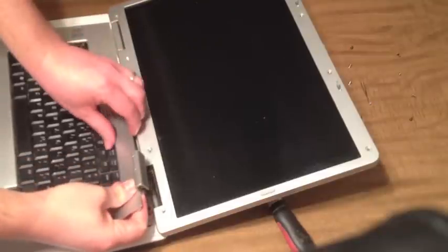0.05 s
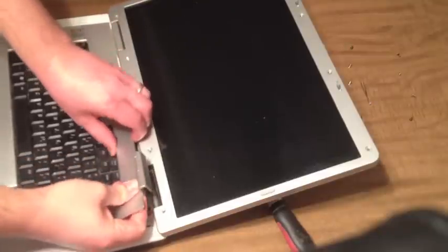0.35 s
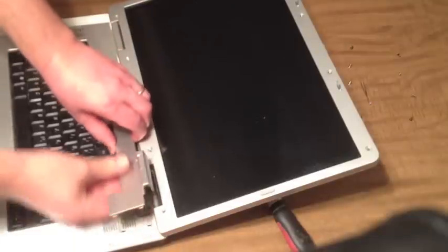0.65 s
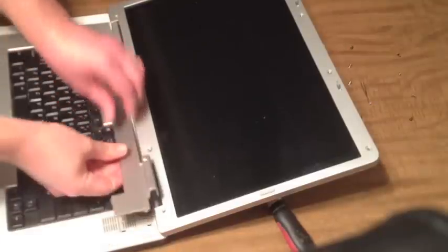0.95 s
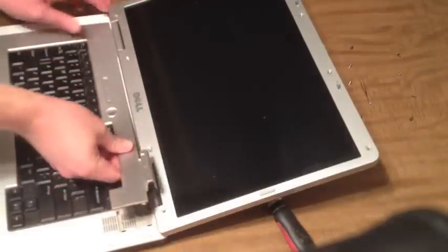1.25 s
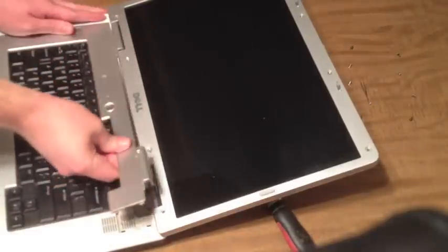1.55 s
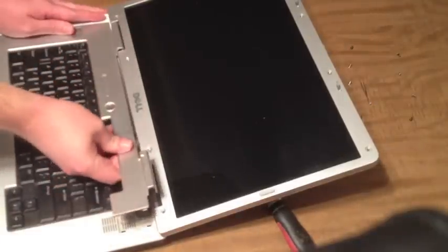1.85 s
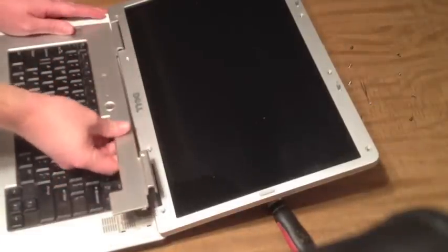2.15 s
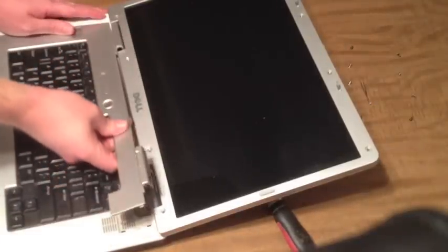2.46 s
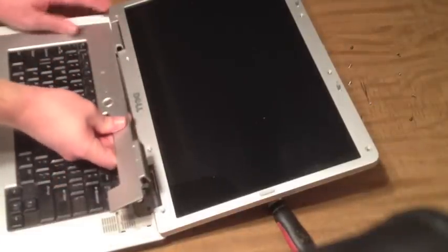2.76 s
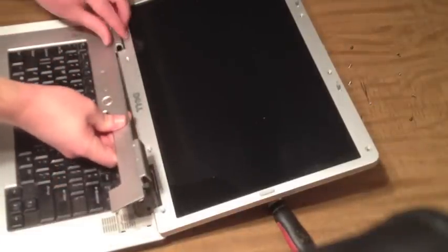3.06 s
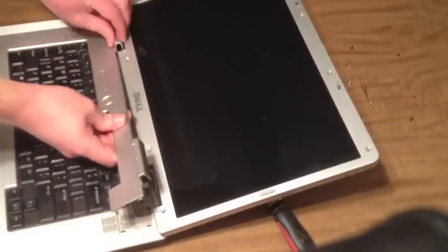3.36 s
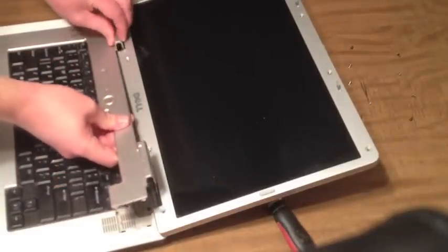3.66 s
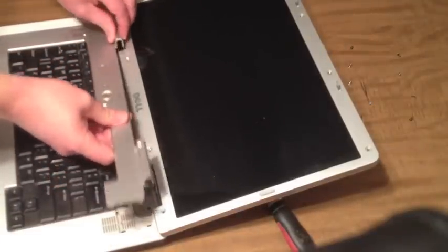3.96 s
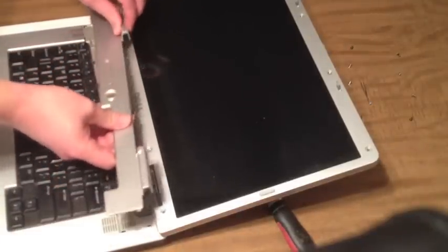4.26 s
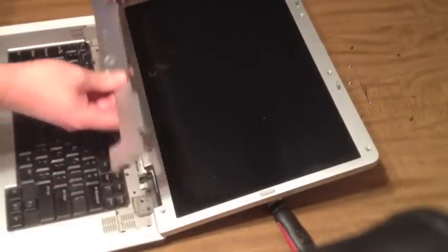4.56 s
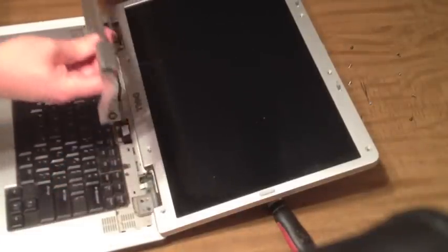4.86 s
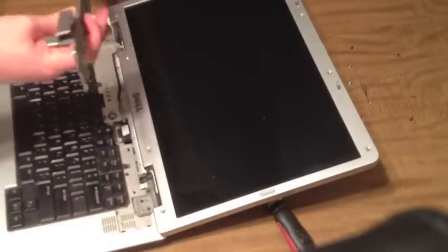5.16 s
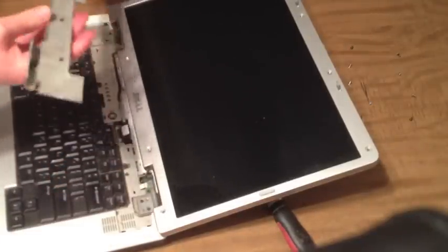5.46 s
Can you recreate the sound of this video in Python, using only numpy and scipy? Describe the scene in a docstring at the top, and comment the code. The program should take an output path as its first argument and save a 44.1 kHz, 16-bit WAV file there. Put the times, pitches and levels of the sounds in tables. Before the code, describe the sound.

Hard plastic clips snap and click loose as a laptop keyboard cover is pried off by hand in a quiet room.

```python
"""A plastic keyboard cover is pried off a laptop on a wooden table in a small room.
Catches skid free with snaps and clicks that ring the cover and rattle the case; thin hooks flick.
Fingers stick and slip on the plastic. At the last snap the case drops back and the table booms.
Behind it: a quiet rush and hum, a faint opening swell of hiss, and a clock ticking on a far wall."""
import sys
import numpy as np
from scipy import signal
from scipy.fft import rfft, irfft, next_fast_len
from scipy.io import wavfile

SR = 44100
rng = np.random.default_rng(int(sys.argv[2]) if len(sys.argv) > 2 else 0)


def digitize_waveform(pressure):
    """Quantize a signal to 16-bit integers and store it at the path in sys.argv[1].

    Rows of a 2-D input are taken as channels; values are limited to [-1, 1].
    """
    field = np.atleast_2d(pressure).T
    bounded = np.clip(field, -1, 1)
    quanta = np.round(bounded * 32767).astype(np.int16)
    wavfile.write(sys.argv[1], SR, quanta)


N = 243598
TIME_S = np.arange(N) / SR
EDGES_HZ = np.r_[40, 63, 90, 125, 180, 250, 355, np.geomspace(500, 16500, 16)]
CENTRES_HZ = np.sqrt(EDGES_HZ[:-1] * EDGES_HZ[1:])
BANK = [signal.butter(2, pair, "band", fs=SR, output="sos") for pair in zip(EDGES_HZ, EDGES_HZ[1:])]

# room decay: (frequency [Hz], T60 [s])
ROOM_DECAY = [(150, .5), (300, 0.57), (800, 0.36), (2000, 0.47), (4500, 0.44), (8000, .41), (14000, 0.34)]
# room response re direct sound: (frequency [Hz], level [dB])
ROOM_SPECTRUM = [(150, -1), (600, -4), (1500, -0.5), (4000, -2), (8000, -1.5), (14000, -2)]
# room rush: (frequency [Hz], relative density [dB])
RUSH_SPECTRUM = [(24, -69), (40, -34), (91, -33), (126, -5), (150, -9.5), (266, -8), (309, -5.5),
                 (522, -11), (653, -15.5), (1080, -16.5), (1860, -25.5), (4240, -26.5), (10400, -35),
                 (11200, -31.5), (15500, -34)]
# hum: (frequency [Hz], level [dB])
HUM_TONES = [(142, -72.5), (165, -69.5), (308, -71.5), (356, -72), (1064, -77.5), (11079, -91.5)]
# short finger rubs; the second row is a faint, slow swell of background hiss at the start:
# (centre time [s], half length [s], hiss level [dB])
SWELLS = [(.01, 0.065, -71.5), (.2, 1, -75.5), (0.602, 0.089, -69.5), (.75, 0.025, -68),
          (1.185, 0.019, -67), (1.278, 0.11, -68.5), (2.03, 0.028, -72), (2.142, 0.077, -71),
          (2.807, 0.096, -77.5), (4.581, 0.075, -72.5), (4.738, 0.076, -74.5)]
# squeak: (frequency [Hz], relative density [dB])
SQUEAK_SPECTRUM = [(500, -5.5), (850, -1), (1400, -4.5), (2700, -11), (3600, -5.5), (4400, -3.5),
                   (5500, -17), (9000, -44)]
# hiss: (frequency [Hz], relative density [dB])
HISS_SPECTRUM = [(2500, -17.5), (5500, 1.5), (8500, 6), (12000, 2), (15500, -13)]
# clockwork: (frequency [Hz], width [Hz], gain [dB])
CLOCK_MODES = [(1850, 130, -18.5), (2672, 350, -22.5), (3900, 1100, -21)]
# hooks flicking free: (time [s], peak [dB], swell [ms])
HOOK_FLICKS = [(0.6666, -43.5, 0.84), (0.8854, -21.5, 0.44), (2.277, -50, 1.1), (3.3305, -15, 0.57),
               (3.4478, -29.5, .86)]
# catches releasing, parts knocking: (time [s], level [dB], case thud [dB], contact [ms],
# panel mode [Hz], panel gain [dB], catch mode [Hz], crack length [ms], case rattle [dB])
SNAP_EVENTS = [(0.667, -25, 14, .03, 1600, -10, 4130, 10, -18),
               (0.866, -26, 32.5, 0.095, 790, 9, 3500, 4, -13),
               (0.887, -14.5, 10, .3, 365, 8, 3960, 4, -25),
               (0.894, -6.5, -5.5, 0.53, 934, 4, 4250, 2.3, -4),
               (1.45, -18.5, 5.5, 0.23, 810, 2, 2330, 5, -9),
               (1.5384, 12.5, -6.5, 0.028, 783, -3, 4326, 3.8, -16),
               (1.608, 10, -9, 0.21, 1365, 1.5, 4650, 4.1, -28),
               (1.6147, -1, 2, .6, 1640, 4, 4600, 0.43, -33),
               (1.898, -27.5, 8, 0.65, 1200, 5, 3000, 9.8, 1),
               (2.2788, -27.5, -4, .14, 823.5, 7, 4310, 6.2, -15),
               (3.329, 6.5, -9, 0.078, 1180, -2, 4020, 3.6, -13),
               (3.4472, -15, -33, 0.094, 1290, -6, 3700, 2.4, -13),
               (3.589, 3, -6, 0.33, 580, 12, 1860, 3, -14), (3.648, 0, -15, 0.9, 1160, 1, 1810, 6, -11),
               (3.82, 2, -3, 0.28, 1770, 5, 3800, 2.4, -15.5),
               (3.8951, 3.5, 6, 0.17, 632, 8, 4050, 5.6, -7)]
# colour of all blows: (frequency [Hz], gain [dB])
PLASTIC_SPECTRUM = [(80, -18), (200, -8.5), (400, -0.5), (800, 2), (1600, 0.5), (2200, -2), (3000, -1),
                    (4200, -0.5), (6000, -2), (9000, -0.5), (13000, -2.5), (15500, -6.5)]
# case rattle: (frequency [Hz], T60 [s])
RATTLE_DECAY = [(200, 0.25), (1000, 0.18), (4000, 0.072), (13000, 0.083)]
# cover: (frequency [Hz], width [Hz], gain [dB])
COVER_MODES = [(245, 36, 2), (366, 16, 3), (585, 44, -6), (715, 35, -16), (830, 63, -3.5), (1150, 58, -8),
               (1220, 48, -6), (1275, 16, -5), (1670, 36, -10.5), (1780, 89, -12), (2860, 310, -9.5),
               (4680, 140, -4.5), (7580, 210, -5), (9140, 37, -8)]


def from_db(db):
    """Decibels to gain."""
    return 10 ** (np.asarray(db) / 20)


def unit_rms(x):
    """Scale to rms 1."""
    return x / np.sqrt(np.mean(x ** 2) + 1e-20)


def at_hz(table, hz):
    """Interpolate a table over log frequency."""
    known_hz, values = np.transpose(table)
    return np.interp(np.log(np.maximum(hz, 1)), np.log(known_hz), values)


def add(track, time_s, sound):
    """Mix a sound in at time_s."""
    start = round(time_s * SR)
    track[start:start + len(sound)] += sound[:len(track) - start]


def resonance(x, hz, width_hz):
    """Two-pole resonator, peak gain 1."""
    radius = np.exp(-np.pi * width_hz / SR)
    feedback = [1, -2 * radius * np.cos(2 * np.pi * hz / SR), radius ** 2]
    return signal.lfilter(np.array([1, 0, -1]) * (1 - radius ** 2) / 2, feedback, x)


def coloured(noise, spectrum):
    """Shape noise to a spectrum, rms 1."""
    size = next_fast_len(N, True)
    gain = from_db(at_hz(spectrum, np.fft.rfftfreq(size, 1 / SR)))
    return unit_rms(irfft(rfft(noise, size) * gain, size)[:N])


def drift(rate_hz):
    """Random wander, rms 1."""
    knots = rng.standard_normal(2000)
    return unit_rms(np.interp(TIME_S * rate_hz, np.arange(len(knots)), knots))


def band_decays(t, t60_table):
    """One exponential decay per band."""
    return [np.exp(-np.log(1000) * t / t60_s) for t60_s in at_hz(t60_table, CENTRES_HZ)]


def burst(envelopes, levels_db):
    """Dense modes as noise: each band has its own envelope and energy per Hz."""
    out = 0
    for sos, width_hz, envelope, level_db in zip(BANK, np.diff(EDGES_HZ), envelopes, levels_db):
        band = signal.sosfilt(sos, rng.standard_normal(len(envelope)) * envelope + 1e-18)
        out = out + band * from_db(level_db) * np.sqrt(2 * width_hz / SR / np.sum(band ** 2))
    return out


def room_response(levels_db, gap_s=0.0015, build_s=0.0015, early_gain=0.88, early_s=0.018):
    """Screen, table and near walls reflect first; a dense tail decays band by band."""
    t = TIME_S[:SR * 3 // 5]
    onset = 1 - np.exp(-np.maximum(t - gap_s, 0) / build_s)
    early = 1 + early_gain * np.exp(-t / early_s)
    envelopes = [onset * early * decay for decay in band_decays(t, ROOM_DECAY)]
    return burst(envelopes, levels_db + at_hz(ROOM_SPECTRUM, CENTRES_HZ))


def rush_and_hum(rush_db=-63, width_hz=9):
    """Soft broadband rush plus wavering tones of narrowband noise."""
    out = from_db(rush_db) * coloured(rng.standard_normal(N), RUSH_SPECTRUM)
    for hz, level_db in HUM_TONES:
        narrow = resonance(rng.standard_normal(N), hz, width_hz)
        out += from_db(level_db) * unit_rms(resonance(narrow, hz, width_hz))
    return out


def rubs_and_hiss(grain_db=2.0, uneven_db=-0.45, grip_db=-76, squeak_db_per_db=1.5):
    """Short swells: skin sticks and slips, squeaking more when pressed. Slow swell: background hiss."""
    grains = from_db(grain_db * drift(250) + uneven_db * drift(40))
    squeak = coloured(rng.standard_normal(N) * grains, SQUEAK_SPECTRUM)
    hiss = coloured(rng.standard_normal(N) * grains, HISS_SPECTRUM)
    out = np.zeros(N)
    for centre_s, half_s, hiss_db in SWELLS:
        swell = np.exp(-((TIME_S - centre_s) / half_s) ** 2)
        squeak_db = grip_db + squeak_db_per_db * (hiss_db - grip_db)
        out += swell * (from_db(squeak_db) * squeak + from_db(hiss_db) * hiss)
    return out


def clock(first_s=0.123, period_s=1, lead_s=0.019, lead_db=-3, chatter_s=0.012, top_hz=5500):
    """Small gears chatter twice per tick, so far off that only the reverberation arrives."""
    gears, t = np.zeros(N), TIME_S[:SR // 10]
    for time_s in np.arange(first_s, N / SR, period_s):
        chatter = rng.standard_normal(len(t)) * np.exp(-t / chatter_s)
        chatter /= np.linalg.norm(chatter)
        add(gears, time_s - lead_s, from_db(lead_db) * chatter)   # drive clicks
        add(gears, time_s, chatter)   # hand steps
    ticks = sum(from_db(db) * resonance(gears, hz, width_hz) for hz, width_hz, db in CLOCK_MODES)
    ticks = signal.sosfilt(signal.butter(2, top_hz, fs=SR, output="sos"), ticks)
    return signal.fftconvolve(ticks, room_response(0))[:N]


def hooks(ring_hz=3760, room_db=-6):
    """Each thin hook swings briefly and is damped; the room carries it on."""
    out, t = np.zeros(N), TIME_S[:SR // 30]
    for time_s, peak_db, swell_ms in HOOK_FLICKS:
        age = 1000 * t / swell_ms
        envelope = (age * np.exp(1 - age)) ** 2
        add(out, time_s, from_db(peak_db) * envelope * np.sin(2 * np.pi * ring_hz * t))
    return out + signal.fftconvolve(out, room_response(room_db))[:N]


def blow_levels_db(level_db, thud_db, contact_ms, case_hz=700):
    """Band levels of a blow: moving the whole case adds bass, longer contact cuts treble."""
    bass_db = thud_db / (1 + (CENTRES_HZ / case_hz) ** 2)
    treble_loss_db = 10 * np.log10(1 + (CENTRES_HZ * contact_ms / 1000) ** 2)
    return level_db + bass_db - treble_loss_db + at_hz(PLASTIC_SPECTRUM, CENTRES_HZ)


def snap(room, levels_db, panel_hz, panel_db, catch_hz, crack_ms, rattle_db,
         rise_share=0.022, scatter_share=0.38, panel_width_hz=90, catch_width_hz=380, catch_db=1.0):
    """A catch skids over its lip; the case rattles on, and panel, catch and cover ring."""
    t = TIME_S[:SR // 8]
    skid = t * 1000 / crack_ms
    crack = np.exp(-skid ** 4)
    rise = 1 - np.exp(-skid / rise_share)
    envelopes = [rise * (crack + from_db(rattle_db) * decay) for decay in band_decays(t, RATTLE_DECAY)]
    direct = burst(envelopes, levels_db)
    blow = np.sqrt(scatter_share) * room_response(levels_db)   # sound thrown in other directions
    add(blow, 0, np.sqrt(1 - scatter_share) * signal.fftconvolve(direct, room))
    add(blow, 0, direct)
    modes = [(panel_hz, panel_width_hz, panel_db), (catch_hz, catch_width_hz, catch_db), *COVER_MODES]
    return blow + sum(from_db(db) * resonance(blow, hz, width_hz) for hz, width_hz, db in modes)


def snaps():
    """Catches and knocks, each with the tone of its spot on the case."""
    out, room = np.zeros(N), room_response(0)
    for time_s, level_db, thud_db, contact_ms, *spot in SNAP_EVENTS:
        add(out, time_s, snap(room, blow_levels_db(level_db, thud_db, contact_ms), *spot))
    return out


def table_thump(time_s=3.897, level_db=-44, start_hz=165, rest_hz=131, settle_s=0.03,
                attack_s=0.004, length_s=0.108):
    """The case drops back; the table top booms, falling in pitch as it settles."""
    out, t = np.zeros(N), TIME_S[:SR // 3]
    hz = rest_hz + (start_hz - rest_hz) * np.exp(-t / settle_s)
    envelope = (1 - np.exp(-t / attack_s)) * np.exp(-(t / length_s) ** 6)
    add(out, time_s, from_db(level_db) * envelope * np.sin(2 * np.pi * np.cumsum(hz) / SR))
    return out


def scene():
    """Mono sum of laptop, table, fingers and background."""
    return (snaps() + hooks() + table_thump() + rubs_and_hiss() + rush_and_hum() + clock())[None]


def record(dry, notch_hz=5200, notch_width_hz=600, notch_depth=0.59, ceiling=3.6,
           low_cut_hz=90, high_cut_hz=15200):
    """Small microphone: treble notch, rounded peaks, low and high cut."""
    x = dry - notch_depth * resonance(dry, notch_hz, notch_width_hz)
    x = ceiling * np.tanh(x / ceiling)
    x = signal.sosfilt(signal.butter(3, low_cut_hz, "high", fs=SR, output="sos"), x)
    return signal.sosfilt(signal.ellip(10, 0.2, 80, high_cut_hz, fs=SR, output="sos"), x)


dry = scene()
out = record(dry)
digitize_waveform(out)
```